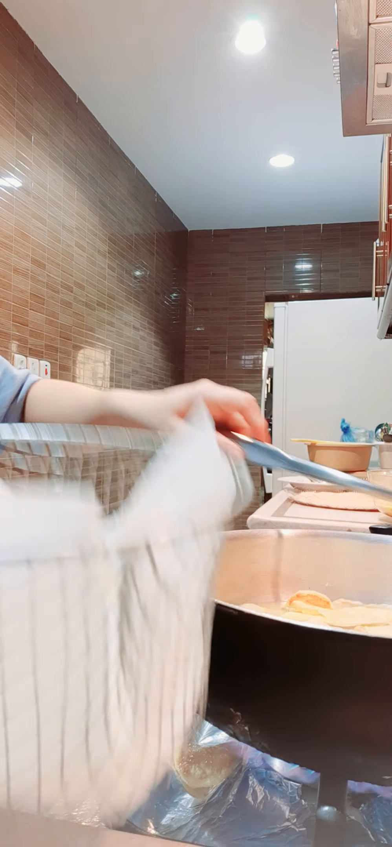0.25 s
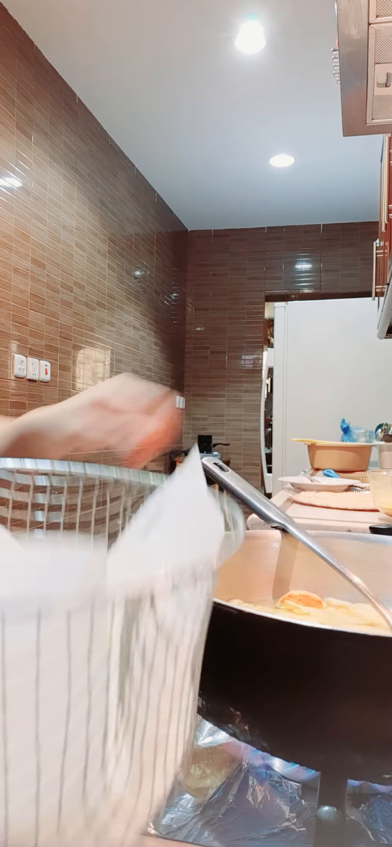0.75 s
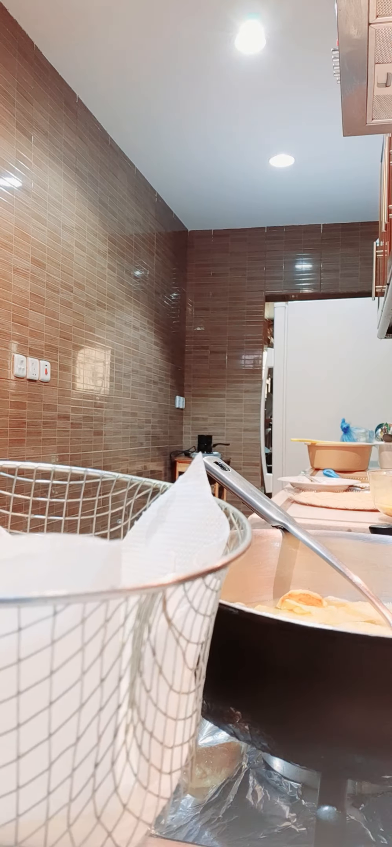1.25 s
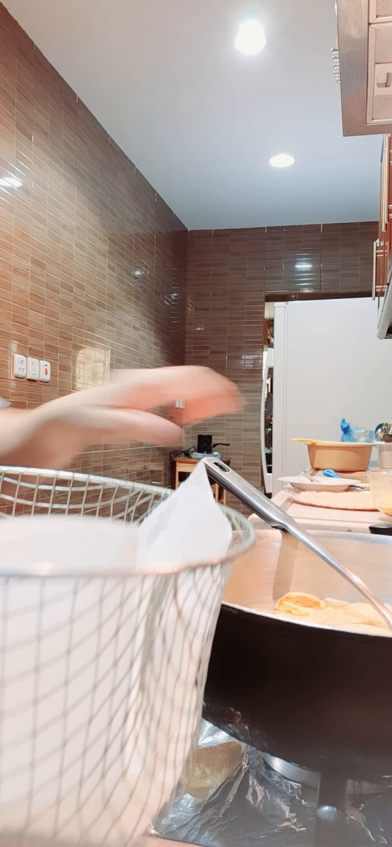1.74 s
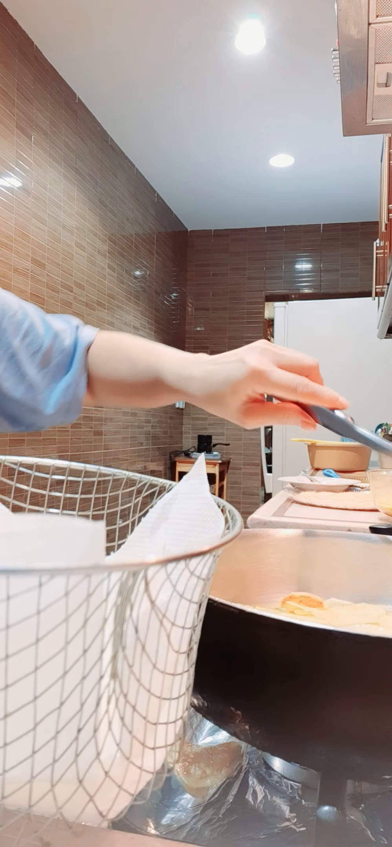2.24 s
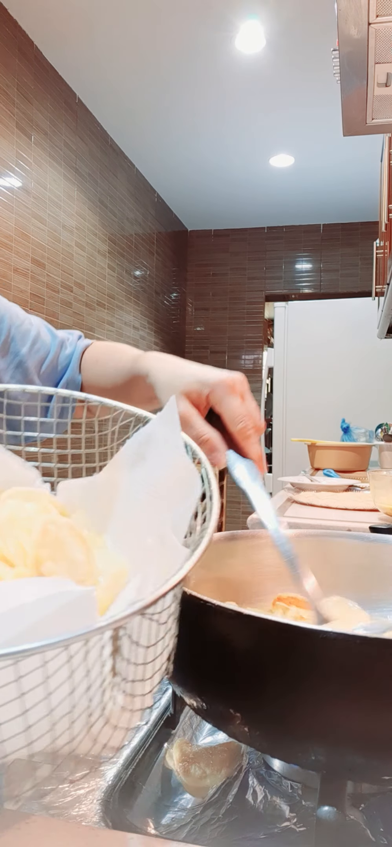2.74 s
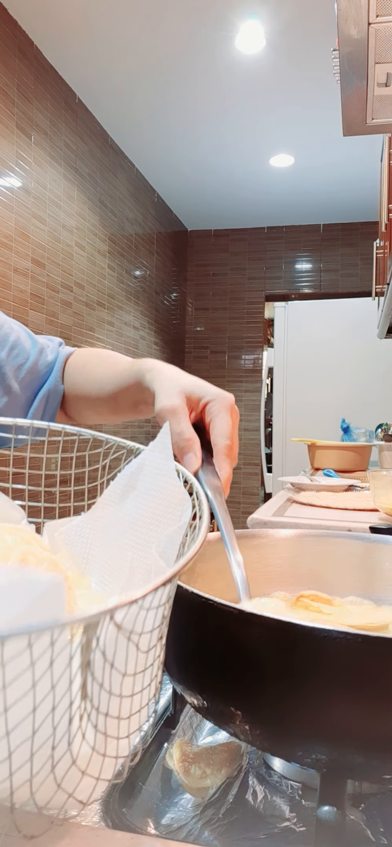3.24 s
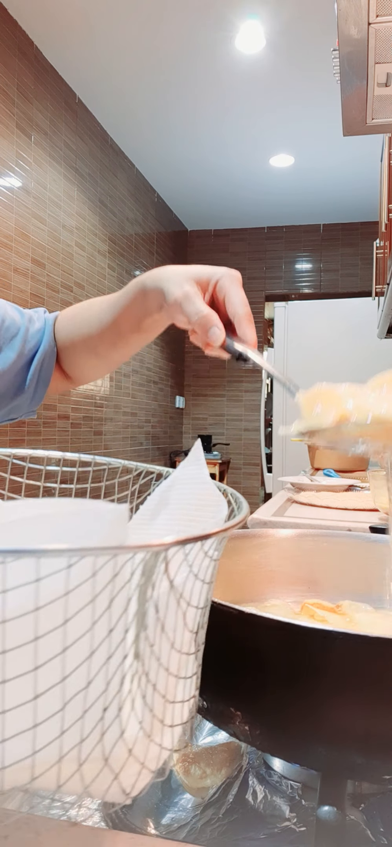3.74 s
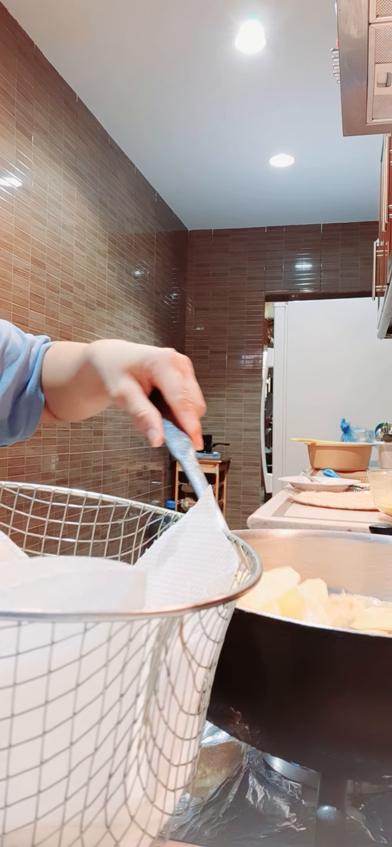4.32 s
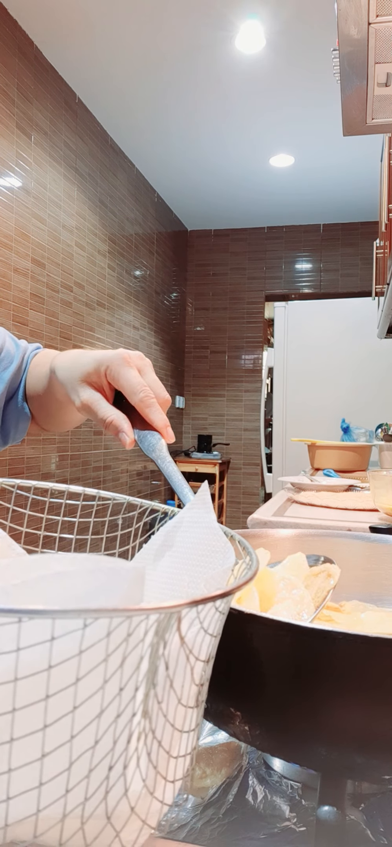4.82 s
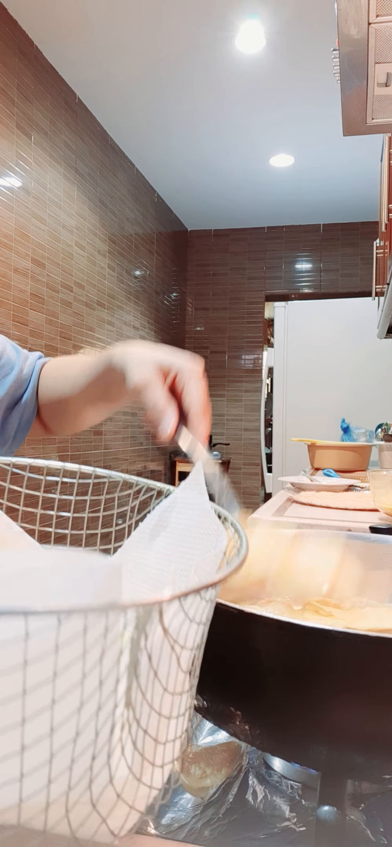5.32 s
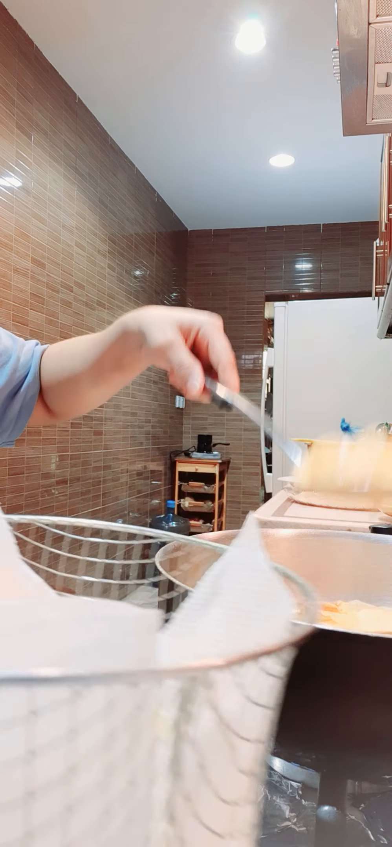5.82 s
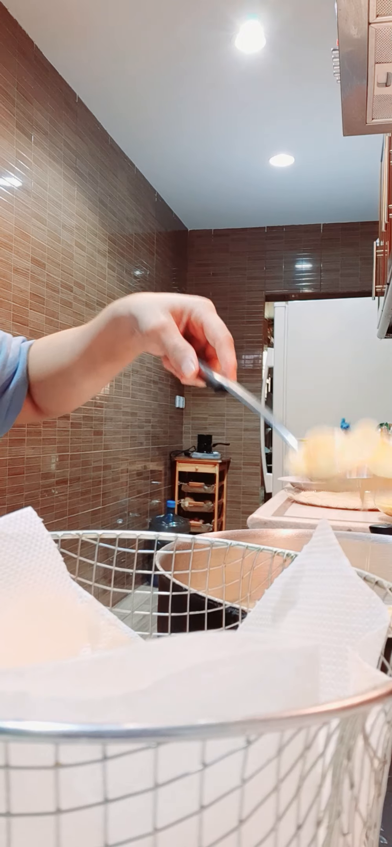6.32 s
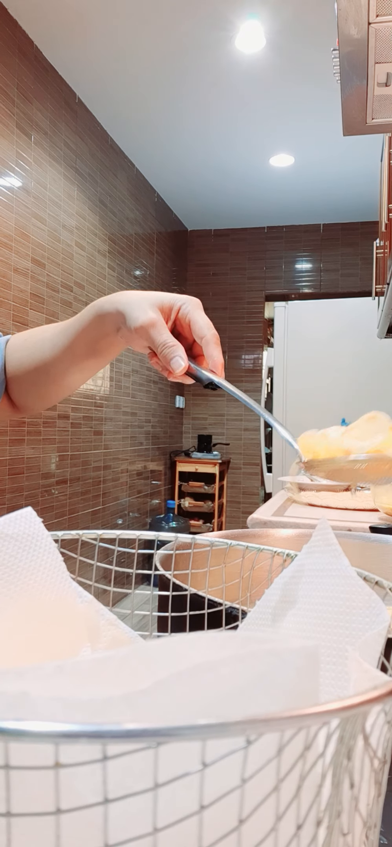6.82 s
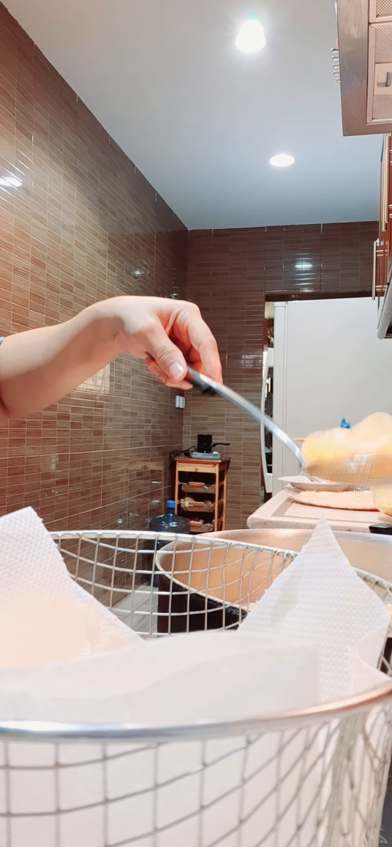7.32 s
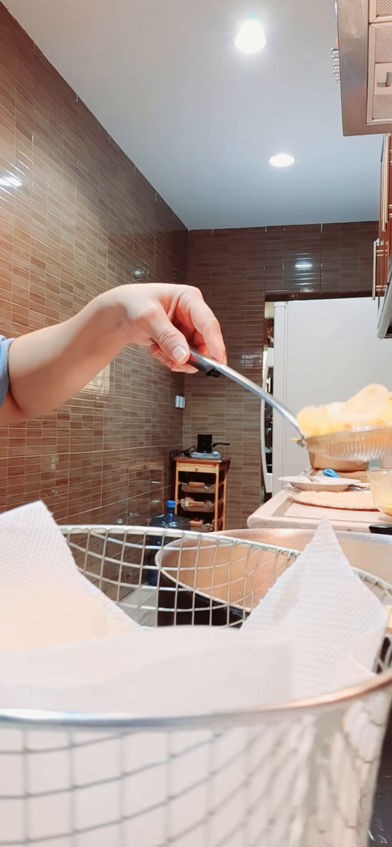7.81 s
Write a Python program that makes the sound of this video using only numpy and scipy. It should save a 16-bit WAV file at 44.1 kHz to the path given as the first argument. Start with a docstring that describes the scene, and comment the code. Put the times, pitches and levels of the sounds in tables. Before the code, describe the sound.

Close in a small tiled kitchen, a metal skimmer taps a pan in light clusters while a gas flame roars softly until a knob scuffs and it stops. After a pause come brighter clinks, brief scrapes and wire basket bumps, then crisp slices rustling and ticking. One sharp clank follows, then quiet, a heavy basket thud, and a last flurry of bumps. A low fan hum wavers throughout. Close stereo microphones, basket toward the right.

```python
"""A metal skimmer clinks and slides on a pan as fried slices are lifted out, in a tiled kitchen.
Clinks and drags ring damped modes; a wire basket, near the right microphone, bumps the counter's modes.
Crisp slices tick as short tuned noise bursts and rustle as a cloud of small random clicks.
Behind them a gas flame roars as resonant noise until its knob is turned, and an extractor fan hums
as wavering sine lines over coloured air noise; feedback delays give the room."""
import sys
import numpy as np
from scipy import signal
from scipy.fft import rfft, irfft, next_fast_len
from scipy.io import wavfile

SR = 44100
rng = np.random.default_rng(int(sys.argv[2]) if len(sys.argv) > 2 else 0)


def materialize(psi):
    """Save the field psi as 16-bit PCM at rate SR to the path in sys.argv[1].

    A 1-D psi becomes a single channel; in a 2-D psi each row is a channel.
    """
    bounded = np.clip(np.atleast_2d(psi).T, -1, 1)
    quanta = np.round(bounded * 32767).astype(np.int16)
    wavfile.write(sys.argv[1], SR, quanta)


N = 355887

# Skimmer striking the pan, and at 3.475 and 3.505 s two bright ticks rung the same way: t/s, treble level/dB,
# body level/dB, top level/dB
CLINKS = [(0.2754, -36, -37, -52), (0.3171, -38, -42, -59), (0.3405, -33, -32.5, -41),
          (0.3769, -34, -38, -52), (0.4355, -18, -34, -26.5), (2.1761, -21, -21, -36),
          (2.2802, -36, -33, -40), (2.2977, -19.5, -24.5, -29.5), (2.348, -23, -33, -36),
          (2.3689, -23.5, -25, -39), (3.4527, -33, -41, -56), (3.475, -40, -50, -42),
          (3.505, -47, -36, -34.5), (3.5797, -36.5, -34, -44), (3.7897, -33, -41, -44),
          (4.155, -12, -20, -23), (5.7374, -38.5, -23.5, -45), (6.3863, -36, -74, -43),
          (7.9683, -26, -24, -34)]
# Modes of the oil-damped pan: f/Hz, level/dB, t60/s
PAN_MODES = [(455, -9, .12), (641, -4, .16), (750, 3, .085), (815, -5, .12), (1105, -4, .12),
             (1220, -4, .08), (1290, -7, .08), (1525, -4, .055), (1830, -8, .07), (2390, -4, .06),
             (2600, -6, .06), (3025, -7, .07), (3550, -2, .1), (3605, -4, .11), (3890, -7, .08),
             (4425, -4, .1), (4750, -5, .08), (5035, -2, .11), (5160, -6, .08), (5540, -6, .1),
             (5915, -7, .11), (6235, -4, .1), (6710, -4, .1), (7100, -6, .1), (7455, -6, .1),
             (11680, -4, .08), (12900, -7, .06), (13890, -5, .06)]
# Skimmer dragged along the pan: start t/s, length/s, level/dB, pitch the contact favours f/Hz
SCRAPES = [(0.312, 0.14, -39.5, 1900), (2.381, 0.063, -34, 1830), (2.46, .11, -35.5, 1598),
           (2.644, 0.13, -40, 1080), (2.758, 0.15, -38.5, 1600), (3.259, 0.074, -43, 1370),
           (3.363, 0.034, -42, 770), (3.452, 0.03, -42.5, 1110), (7.975, .1, -41.5, 1400)]
# Modes of the skimmer bowl pressed on the pan wall: f/Hz, level/dB, t60/s
BOWL_MODES = [(780, 2.5, 0.042), (1130, 7, 0.014), (1394, 5.5, 0.012), (1593, 2, 0.0095), (1812, -4, 0.03),
              (2220, 4.5, 0.014), (2550, 4, 0.011), (3380, 1, 0.0043), (4420, 4.5, 0.0073)]
# Basket on the counter: t/s, level/dB, brightness/dB, left-right/dB, pitch the spot favours f/Hz
BUMPS = [(0.492, -17.5, -3, 0, 520), (0.516, -21.5, -15, 0, 550), (2.548, -11, -10, -6.5, 440),
         (2.559, -18, -20, -3, 170), (2.597, -17.5, -15, -5, 410), (2.839, -22, -15, -8, 414),
         (2.863, -23, -7, -3, 406.8), (5.735, -4.5, -11.5, -6.5, 282), (5.751, -9.5, -19, -4, 125),
         (5.954, -22.5, -26, -6, 296), (6.056, -21.5, -23, -11, 331), (6.088, -21, -18, -6, 382),
         (6.597, -31.5, -21, -3, 452.6), (7.911, -22.5, -14, -6, 350), (7.933, -16.5, -5.5, -5, 298.5),
         (7.971, -16, -2.5, -1, 314), (7.99, -21.5, -22, -2, 322), (8.003, -22, -21, 1, 350.3),
         (8.03, -23, -8, -1, 350)]
# Modes of the counter top: f/Hz, level/dB, t60/s
COUNTER_MODES = [(113.7, -9, 0.2), (172.5, 2, 0.14), (242.6, 0.5, 0.073), (291, 1.5, 0.14),
                 (362, -11.5, 0.089), (411.3, 2, 0.28), (440.5, 3.5, 0.16), (543, -10, 0.13), (546, 3, 0.2),
                 (690, 8, 0.076), (848, -0.5, 0.16), (1043, 21.5, 0.022), (1280, 3, 0.039),
                 (1600, -12, .03), (2010, -11, .03)]
# Crisp slices and oil drops ticking: t/s, peak level/dB, f/Hz, t60/s
TICKS = [(2.871, -27, 5500, .03), (3.6112, -28, 6460, 0.033), (3.64, -36, 6800, .03),
         (3.76, -32, 6700, .03), (3.8214, -22.5, 6950, 0.11), (3.849, -33, 6630, .03),
         (3.895, -25, 11900, .025), (4.395, -30, 5980, .012), (4.467, -37, 5970, 0.017),
         (4.612, -35, 5580, .018), (4.648, -37, 6000, .015), (4.763, -35, 5700, .015),
         (6.437, -37, 6190, .1), (6.8952, -32, 2650, 0.075), (6.981, -38, 2747, .06),
         (7.3432, -30.5, 2050, .06), (7.5765, -35, 7130, .045)]
# Crisp rustle of slices on the move: t/s, level/dB
STIR = [(0.0, -51), (0.27, -48.5), (0.42, -41.5), (0.63, -52.5), (1.5, -56), (2.2, -54.5), (2.36, -42),
        (2.5, -40), (2.66, -47.5), (2.87, -38.5), (3.09, -50), (3.5, -46), (3.84, -48), (4.28, -48),
        (4.65, -53), (5.15, -49), (6.25, -62.5), (7.87, -59.5), (8.07, -48)]
# Spectrum of the rustle: f/Hz, relative level/dB per Hz
RUSTLE_SPECTRUM = [(1500, -3), (2500, -22), (3500, 3.5), (5000, -2.5), (6500, -2), (9000, -7.5),
                   (12000, 4.5), (16000, -10)]
# Gas knob turned: t/s, level/dB, left-right/dB, decay time/s
KNOB_TURN = [(1.055, -24, -1, 0.027)]
# Burner resonances: f/Hz, nominal width/Hz, level/dB
BURNER = [(1392, 105, 5), (1210, 160, -5), (13000, 3600, -10)]
# Fan motor hum: t/s, f/Hz, level/dB
HUM = [(0.0, 99.7, -33), (0.62, 99.9, -29.5), (0.8, 100, -30.5), (1.37, 98.8, -37), (1.76, 97.2, -33),
       (1.98, 97.9, -27.5), (2.85, 98.4, -28.5), (3.1, 99.7, -32.5), (3.58, 98.7, -32.5), (3.68, 99.1, -36),
       (3.78, 98.1, -34.5), (4.22, 99.5, -27.5), (4.43, 99.9, -34), (4.6, 100.3, -28.5),
       (4.76, 100.3, -34.5), (5.41, 100.8, -32), (5.6, 101, -35), (5.8, 99.4, -28.5), (6.2, 100.2, -39.5),
       (6.43, 100.3, -30.5), (6.66, 100.8, -33.5), (6.95, 100.8, -30.5), (7.4, 98.9, -31.5),
       (7.66, 99, -34.5), (8.07, 100.5, -33)]
# Steadier fan lines: f/Hz, level/dB, left-right/dB, waver/dB
FAN_LINES = [(208, -41.5, 2.0, .7), (156, -55, 2.0, 1.5), (299, -53, 0, 2.5), (63, -56, 4.0, 2),
             (343, -58, 0, 2.5)]
# Spectrum of fan air and faint sizzle: f/Hz, relative level/dB per Hz
AIR_SPECTRUM = [(20, -18), (40, -17), (62, 10.5), (100, -15), (150, 4.5), (200, -2.5), (300, -4),
                (450, -1.5), (800, -3.5), (1400, -4), (2200, -12), (3500, -20.5), (7000, -23), (9500, -25),
                (13000, -20), (16000, -17.5)]
# Likeness of the two microphones in coloured noise: f/Hz, likeness (1 same, 0 unrelated)
LIKENESS = [(60, 1), (150, 0.3), (380, 1), (950, -0.11), (2380, -0.14), (5980, 0.022), (15000, -0.11)]
# Side balance of coloured noise: f/Hz, left-right/dB
TILT = [(60, 8), (150, -2), (380, -1), (950, -4), (2380, 0), (5980, -1), (15000, -0.5)]
# Treble difference of the two microphones: f/Hz, left-right/dB
MIC_BALANCE = [(2700, 0), (4200, 0), (6400, -2.5), (8800, 6.5), (10500, 2.5), (12500, -1.5), (15000, -3.5)]

CLINK_PAN_DB, CHATTER_S = -2.5, 0.0098
MIDDLE_DROP_DB = 8   # the middle range lies this far under the mean of body and treble
CRACK_S, CRACK_DB = 0.00055, 2.5   # first touch of metal on metal, above the mean of treble and top
SCRAPE_RISE_S, SCRAPE_FALL_S = 0.026, 0.035
SCRAPE_JUDDER_DB, SCRAPE_JUDDER_HZ = 2.5, 30
FAVOUR_DB, FAVOUR_OCTAVES = 13.5, 0.087   # lift of bowl modes near the favoured pitch
SETTLE_S = 0.019   # wires of the basket settling
SPOT_DB_PER_OCTAVE = 12   # counter modes fall off on both sides of the favoured pitch
FLAME_DB, FLAME_OFF_S, FLAME_DIES_DB_PER_S = -37.5, 1.18, 500
HUM_PAN_DB, HUM_LEFT_PHASE_RAD = 5.5, -0.42
HUM_WAVER_DB, HUM_WAVER_RATE_HZ, HUM_WANDER_HZ = 1.5, 8.9, 0.34
AIR_DB = -40.5
KITCHEN_T60_S, WALL_CUT_HZ = 0.44, 18000
MIC_SHELF_HZ, MIC_SHELF_DB, MIC_LOW_HZ, MIC_TOP_HZ = 7630, -9, 45.3, 16300


def skimmer():
    """Metal on metal: clinks ring the pan under a noisy wire-mesh chatter; drags ring the bowl."""
    return add_scrapes(clinks())


def clinks():
    """Each blow rings the pan's modes, with a chatter of wire mesh and a crack at first touch."""
    s, treble_db, body_db, top_db = np.transpose(CLINKS)
    middle_db = (body_db + treble_db) / 2 - MIDDLE_DROP_DB
    alike = np.ones(len(s))
    pan_db = CLINK_PAN_DB * alike

    def level(hz):
        """Blow levels in the range that holds this mode."""
        if hz < 1900:
            return body_db - 5.5
        if hz < 3400:
            return middle_db - 12.5
        if hz < 8500:
            return treble_db - 20.0
        return top_db - 0.5

    out = strike(s, level, CLINK_PAN_DB, PAN_MODES, contact_s=1e-5, lag=4, scatter_db=4.0)
    chatter = [(570, 1600, body_db - 3.5, 0.62), (2010, 2770, middle_db - 0.1, 4.28),
               (3450, 6600, treble_db - 4.5, 7.0), (7450, 21700, top_db + 8.0, 6.6)]
    for low, high, db, unlike in chatter:
        out += band_noise(low, high, unlike, bursts(s, db, pan_db, CHATTER_S * alike))
    crack = bursts(s, (treble_db + top_db) / 2 + CRACK_DB, pan_db, CRACK_S * alike)
    return out + band_noise(3100, 17000, 1.9, crack)


def add_scrapes(out):
    """Dragging feeds the bowl's modes with dense clicks; each contact favours its own pitch."""
    rub = grains(1200, 3, N) + grains(1200, 3, (2, N))
    # the contact wanders, so each mode swells and fades on its own
    modes = np.array([from_db(db + 3 * drift(12)) * ring(rub, hz, t60) for hz, db, t60 in BOWL_MODES])
    judder = from_db(SCRAPE_JUDDER_DB * drift(SCRAPE_JUDDER_HZ))
    mode_hz = np.array(BOWL_MODES)[:, 0]
    for start, length, drag_db, favour_hz in SCRAPES:
        near = np.exp(-(np.log2(mode_hz / favour_hz) / FAVOUR_OCTAVES) ** 2)
        pressure = from_db(drag_db) * stroke(start, length) * judder
        on = pressure > 0
        rubbed = np.tensordot(from_db(FAVOUR_DB * near), modes[:, :, on], 1)
        out[:, on] += pressure[on] * rms_one(rubbed)
    return out


def stroke(start, length):
    """Envelope of one drag: swells, holds, lets go."""
    t = np.arange(N) / SR - start
    rise = t / SCRAPE_RISE_S + .5
    fall = 1 - (t - length) / SCRAPE_FALL_S
    return np.clip(np.minimum(rise, fall), 0, 1) ** 2


def basket():
    """Dull bumps ring the counter, with a rumble of settling wires; the left microphone is farther."""
    s, peak_db, bright_db, pan_db, spot_hz = np.transpose(BUMPS)
    settle_s = np.full(len(s), SETTLE_S)
    s = s + 0.0014   # the rubbery feet of wire yield before the counter rings

    def spot(hz):
        """Loss in dB away from the pitch favoured by the spot that is hit."""
        return -SPOT_DB_PER_OCTAVE * np.abs(np.log2(hz / spot_hz))

    def level(hz):
        """Bump levels for one counter mode."""
        return peak_db - 8 + (bright_db - 1.5 if hz > 900 else spot(hz))

    out = strike(s, level, pan_db, COUNTER_MODES, contact_s=0.00054, lag=8, scatter_db=1.5)
    for low, high in [(148, 330), (330, 676)]:
        rumble_db = peak_db - 14.5 + spot(np.sqrt(low * high))
        out += band_noise(low, high, 0.67, bursts(s, rumble_db, pan_db, settle_s))
    rattle = bursts(s, peak_db + bright_db - 19.5, pan_db, 0.83 * settle_s)
    out += band_noise(820, 2370, 0.87, rattle)
    # the counter sheds no deep bass
    return signal.sosfilt(signal.butter(5, 68, "high", fs=SR, output="sos"), out)


def slices(rustle_db):
    """Single ticks ring briefly at their own pitch; the rustle is a cloud of small snaps."""
    out = np.zeros((2, N + SR))
    span = np.arange(SR // 10)
    for s, peak_db, hz, t60 in TICKS:
        snap = rng.standard_normal((2, len(span))) * from_db(-60 * span / SR / t60)
        edge = np.diff(snap, prepend=0)
        # two heavily damped resonances tune the noise
        tick = ring(ring(edge, hz, 9.8 / hz), hz, 4.0 / hz) + 0.78 * edge
        out[:, round(s * SR) + span] += from_db(peak_db) * tick / np.abs(tick).max()
    cloud = grains(4000, 3.6, (2, 2, N))
    return out[:, :N] + from_db(rustle_db) * coloured(cloud, RUSTLE_SPECTRUM, patchy_db=2.3)


def knob():
    """A short grainy scuff with a hollow plastic body: two bands of noise under one rough decay."""
    grain = from_db(2.7 * drift(135)) * bursts(*np.transpose(KNOB_TURN))
    scuff = from_db(-12.5) * band_noise(1250, 3400, 1.0, grain)
    return scuff + from_db(-9.0) * band_noise(760, 1360, 0.58, grain)


def flame():
    """Gas jet noise in the burner's resonances, fluttering slightly, fading fast once shut off."""
    noise = rng.standard_normal(N) + 1.3 * rng.standard_normal((2, N))
    roar = sum(from_db(db) * rms_one(ring(noise, hz, 2.0 / width)) for hz, width, db in BURNER)
    dying_db = FLAME_DIES_DB_PER_S * np.maximum(np.arange(N) / SR - FLAME_OFF_S, 0)
    return from_db(FLAME_DB - np.minimum(dying_db, 200) + 1.04 * drift(12)) * rms_one(roar)


def fan():
    """Motor lines over broad air noise; the strongest line wavers in level and pitch."""
    hz, hum_db = in_time(HUM)
    turn = 2 * np.pi * np.cumsum(hz + HUM_WANDER_HZ * drift(HUM_WAVER_RATE_HZ)) / SR
    hum = from_db(hum_db + HUM_WAVER_DB * drift(HUM_WAVER_RATE_HZ))
    out = hum * sides(HUM_PAN_DB)[:, None] * np.sin(turn + np.array([[HUM_LEFT_PHASE_RAD], [0]]))
    for line_hz, line_db, pan_db, waver_db in FAN_LINES:
        phase = 2 * np.pi * line_hz * np.arange(N) / SR + 0.14 * drift(15.0)
        gain = from_db(line_db + waver_db * drift(2.4)) * sides(pan_db)[:, None]
        out += gain * np.sin(phase + np.array([[-.22], [0]]))
    air = coloured(rng.standard_normal((2, 2, N)), AIR_SPECTRUM, patchy_db=1.1)
    return np.sqrt(2) * out + from_db(AIR_DB) * air   # root 2 turns rms into sine height


def kitchen(x):
    """Room reflections: eight feedback delays a side, duller on every round."""
    size = next_fast_len(N + SR)
    w = 2 * np.pi * np.arange(size // 2 + 1) / size
    dull = 1 / (1 + 1j * w * SR / (2 * np.pi * WALL_CUT_HZ))
    tail = np.zeros((2, len(w)), complex)
    for k, lag in enumerate(rng.uniform(.011, .035, 16) * SR):
        loop = from_db(-60 * lag / SR / KITCHEN_T60_S) * dull * np.exp(-1j * w * round(lag))
        tail[k % 2] += loop / (1 - loop) * (-1) ** (k // 2)
    return irfft(tail * rfft(x, size), size)[:, :N]


def strike(times, level_db, pan_db, modes, contact_s, lag, scatter_db):
    """Each blow is a short push into every mode; level_db(hz) gives the blows' levels.
    Strength scatters by mode and side; the higher the mode, the more often the right side flips sign."""
    at = np.round(np.array(times) * SR).astype(int)
    out = np.zeros((2, N))
    soft = np.exp(-1 / (contact_s * SR))
    for hz, mode_db, t60 in modes:
        force, draw = np.zeros((2, N + SR)), rng.standard_normal((len(at), 4))
        blow_db = level_db(hz) + mode_db + scatter_db * draw[:, 0]
        gain = from_db(blow_db) * sides(pan_db + scatter_db * draw[:, 1])
        # waves arrive by different paths
        late = at + np.round(np.abs(draw[:, 3]) * .2 * SR / hz).astype(int)
        force[0, late + lag] = gain[0]   # the left microphone hears it lag samples later
        force[1, late] = gain[1] * np.where(draw[:, 2] > 1200 / hz - .3, -1, 1)
        out += ring(force[:, :N], hz, t60)
    return signal.lfilter([1 - soft], [1, -soft], out)


def ring(clicks, hz, t60):
    """A damped resonance: a unit click sets a sine of height 1 ringing."""
    r, w = from_db(-60 / (t60 * SR)), 2 * np.pi * hz / SR
    return signal.lfilter([0, np.sin(w)], [1, -2 * r * np.cos(w), r * r], clicks + 1e-18)


def bursts(times, level_db, pan_db, length_s):
    """Stereo envelope of sudden starts that die away exponentially."""
    out, span = np.zeros((2, N + SR)), np.arange(SR // 8)
    for s, db, pan, length in zip(times, level_db, pan_db, length_s):
        decay = np.exp(-span / SR / length)
        out[:, round(s * SR) + span] += from_db(db) * sides(pan)[:, None] * decay
    return out[:, :N]


def band_noise(low, high, unlike, envelope):
    """Noise of about rms 1 in a band, partly common to both sides, under an envelope."""
    noise = rms_one(rng.standard_normal(N) + unlike * rng.standard_normal((2, N)))
    noise = noise / np.sqrt((high - low) / SR * 2)
    band = signal.butter(2, [low, high], "band", fs=SR, output="sos")
    return signal.sosfilt(band, noise * envelope + 1e-18)


def grains(per_s, spread_db, shape):
    """Random clicks of very uneven size."""
    sizes = from_db(spread_db * np.minimum(rng.exponential(1, shape), 5)) * rng.choice([-1, 1], shape)
    return sizes * (rng.random(shape) < per_s / SR)


def coloured(source, spectrum, patchy_db):
    """Half-octave bands of a (draw, mid/side, time) source, each with level, flicker, likeness; rms 1."""
    out, together = 0, drift(1.5)
    edges = 22 * 2 ** np.arange(0, 10, .5)
    for k, (low, high) in enumerate(zip(edges, np.append(edges[1:], 19000))):
        hz = np.sqrt(low * high)
        if hz <= spectrum[0][0]:
            continue
        band = signal.butter(2, [low, high], "band", fs=SR, output="sos")
        mid, side = signal.sosfilt(band, source[k % 2])   # neighbouring bands use different draws
        alike = np.clip(at_hz(LIKENESS, hz), -1, 1)
        flicker_db = patchy_db * (0.24 * together + drift(11.0))
        gain = from_db(at_hz(spectrum, hz) + flicker_db) * sides(at_hz(TILT, hz))[:, None]
        out = out + gain * (np.sqrt(1 + alike) * mid + np.sqrt(1 - alike) * side * [[1], [-1]])
    return rms_one(out)


def drift(rate):
    """Slow chance: noise through a double one-pole low-pass at rate Hz; rms about 1."""
    r = np.exp(-80 * np.pi * rate / SR)   # one step every 40 samples
    noise = rng.standard_normal(N // 40 + 2002)
    slow = signal.lfilter([1], [1, -2 * r, r * r], noise)[2000:]
    return np.interp(np.arange(N) / 40, np.arange(len(slow)), rms_one(slow))


def from_db(db):
    """Amplitude gain of a level in dB."""
    return 10 ** (np.asarray(db) / 20)


def rms_one(x):
    """Scale to rms 1 over all channels."""
    return x / np.sqrt(np.mean(x ** 2) + 1e-20)


def sides(pan_db):
    """Left and right gains of a level difference."""
    return from_db(np.multiply.outer([.5, -.5], pan_db))


def in_time(rows):
    """Draw each column of a timed table as a line through its points."""
    s, *columns = np.transpose(rows)
    return [np.interp(np.arange(N) / SR, s, c) for c in columns]


def at_hz(points, hz):
    """Read a table at a frequency, on a logarithmic pitch axis."""
    return np.interp(np.log(hz), np.log(np.array(points)[:, 0]), np.array(points)[:, 1])


def scene():
    """Close sources dry and through the room; fan and flame without added room."""
    bright = skimmer() + slices(*in_time(STIR)) + knob()
    bumps = basket()
    room = kitchen(from_db(-13.5) * bright + from_db(-18.0) * bumps)
    return bright + bumps + room + fan() + flame()


def record(dry):
    """Two microphones lose deep bass and step down in the treble, each its own way; the top is cut."""
    size = next_fast_len(N + SR // 10)
    hz = np.arange(size // 2 + 1) * SR / size
    step = from_db(MIC_SHELF_DB * (.5 + .5 * np.tanh((hz - MIC_SHELF_HZ) / 300)))
    step = step * sides(at_hz(MIC_BALANCE, hz + 1))
    heard = irfft(rfft(dry, size) * step, size)[:, :N]
    heard = signal.sosfilt(signal.butter(2, MIC_LOW_HZ, "high", fs=SR, output="sos"), heard)
    return signal.sosfilt(signal.cheby2(20, 60, MIC_TOP_HZ, fs=SR, output="sos"), heard)


dry = scene()
out = record(dry)
materialize(out)
```